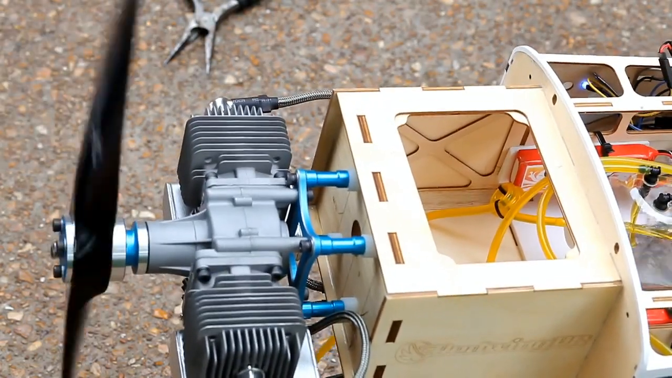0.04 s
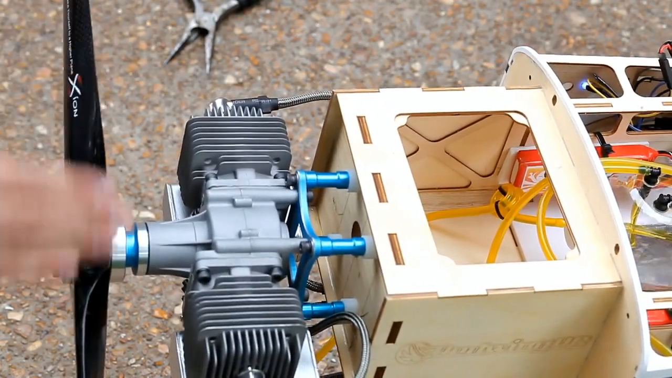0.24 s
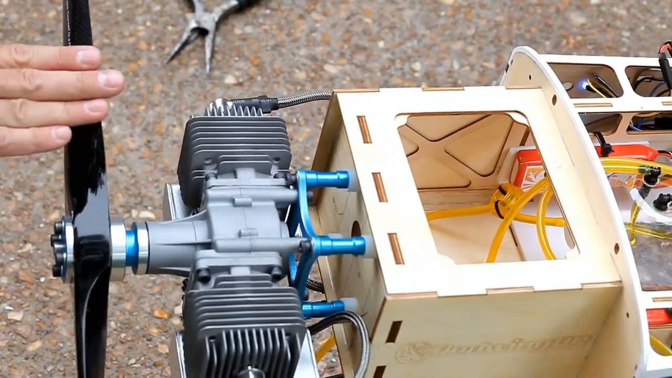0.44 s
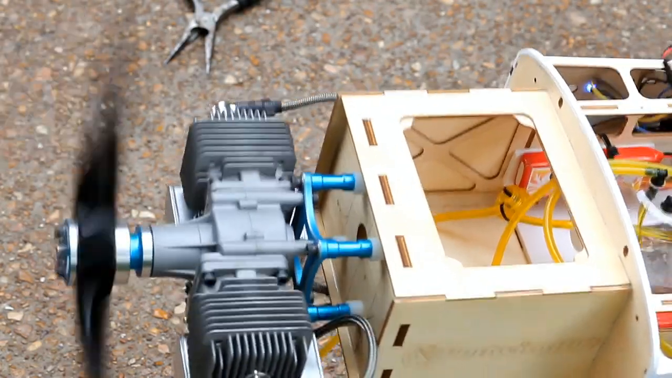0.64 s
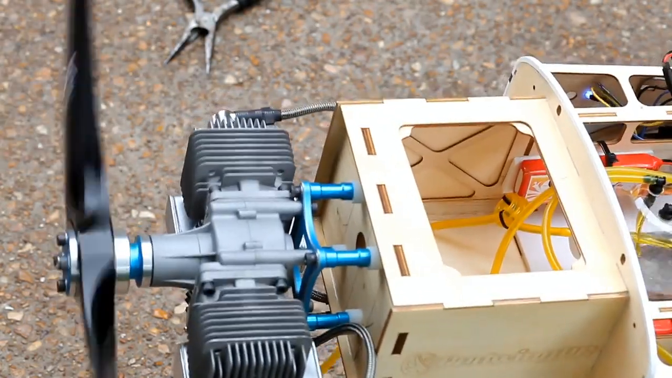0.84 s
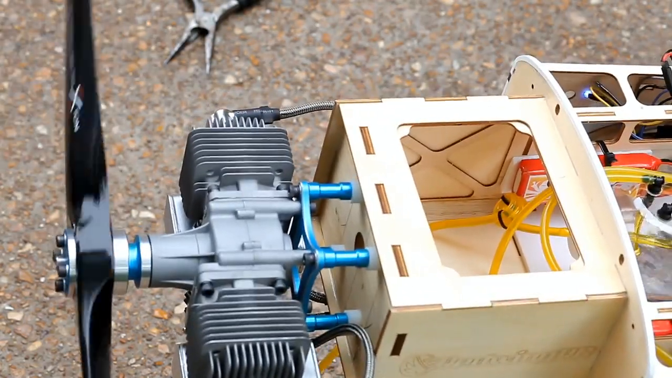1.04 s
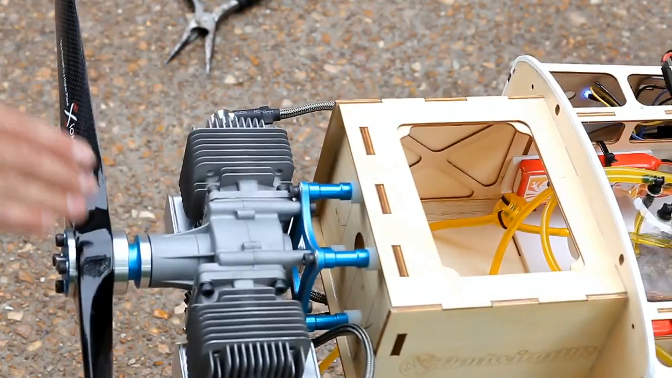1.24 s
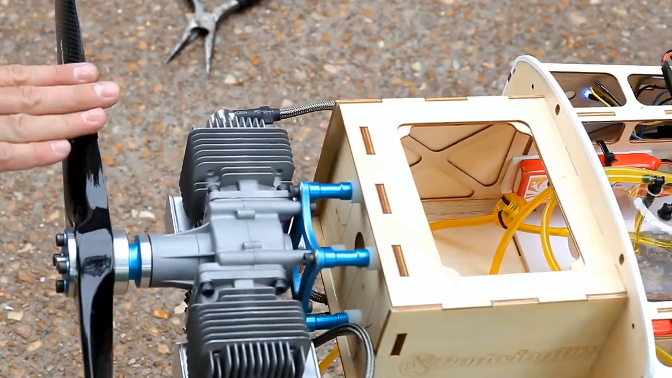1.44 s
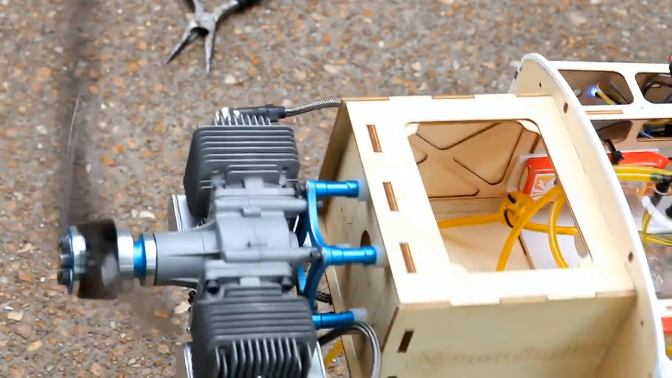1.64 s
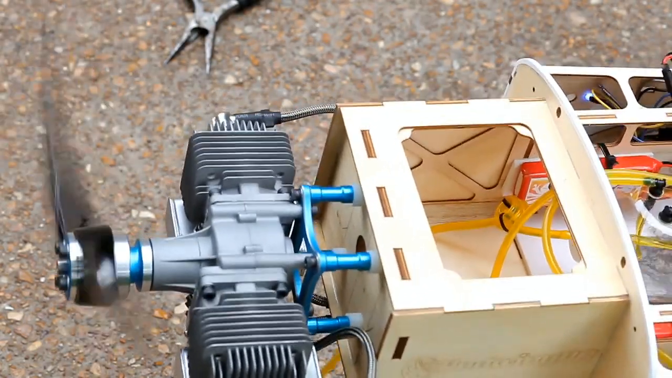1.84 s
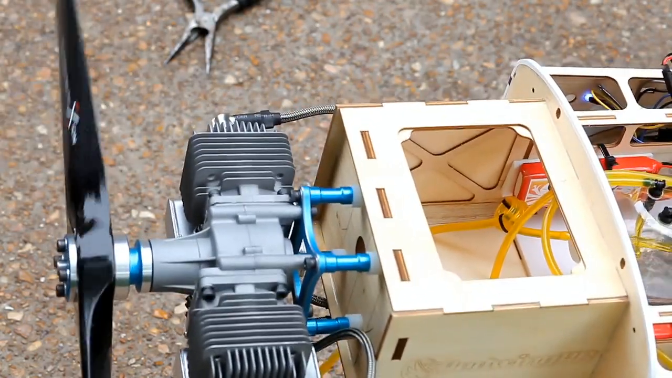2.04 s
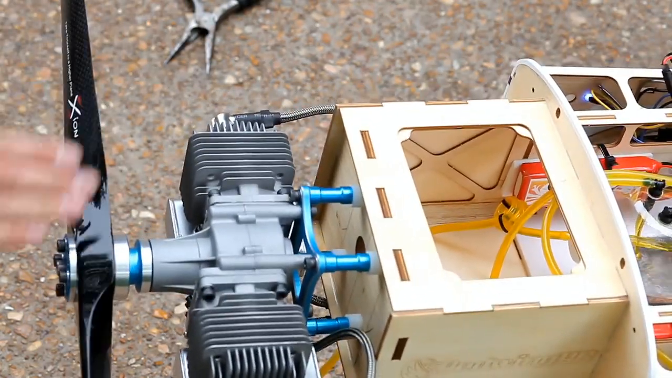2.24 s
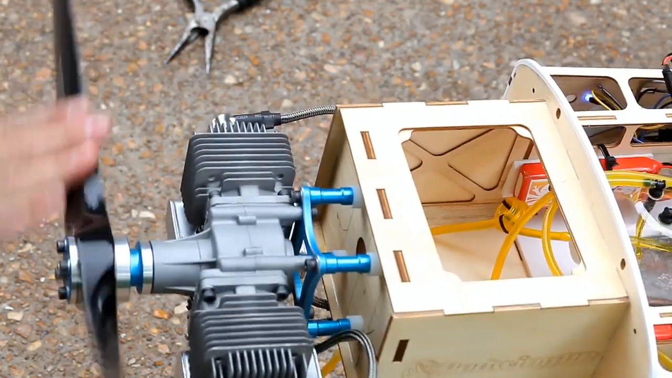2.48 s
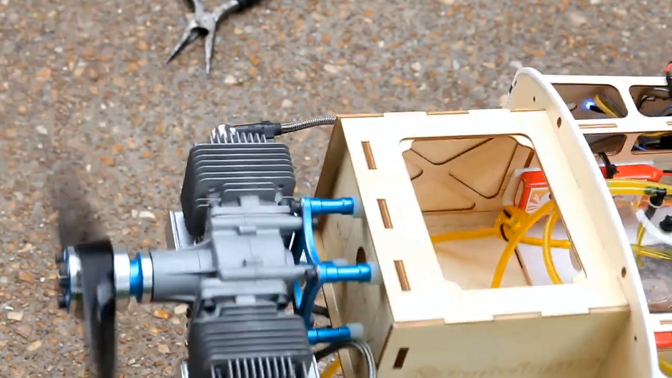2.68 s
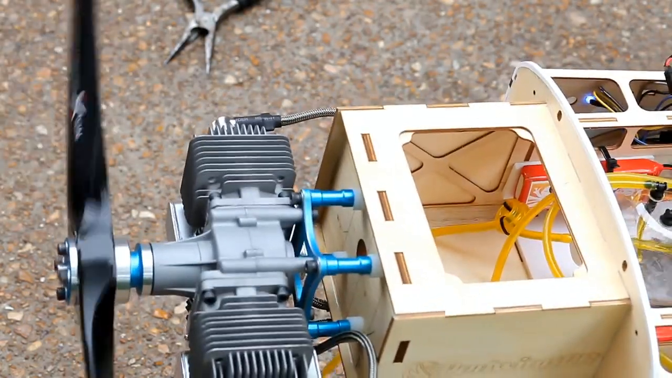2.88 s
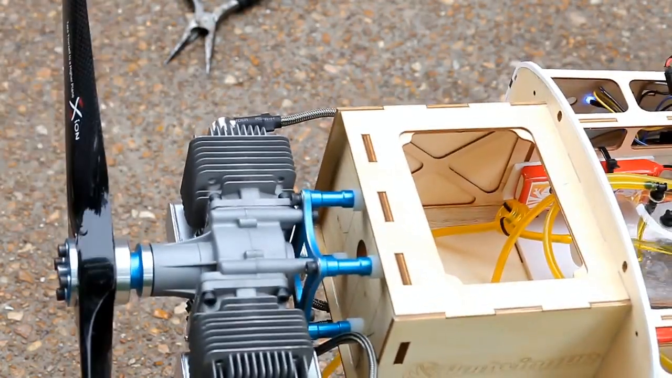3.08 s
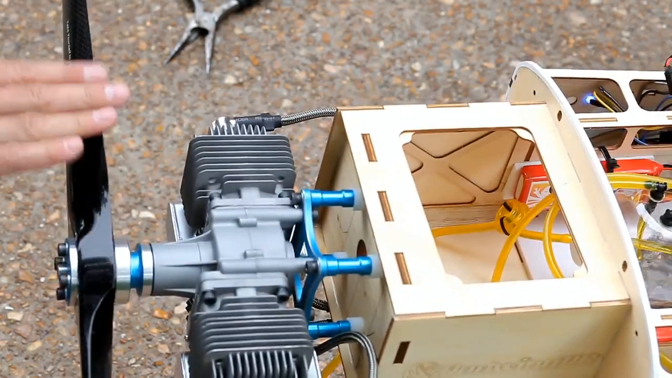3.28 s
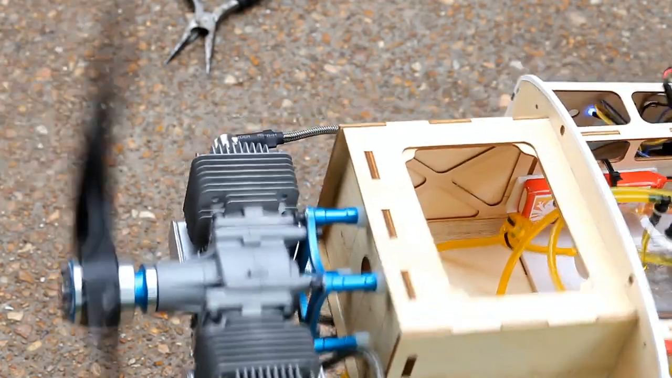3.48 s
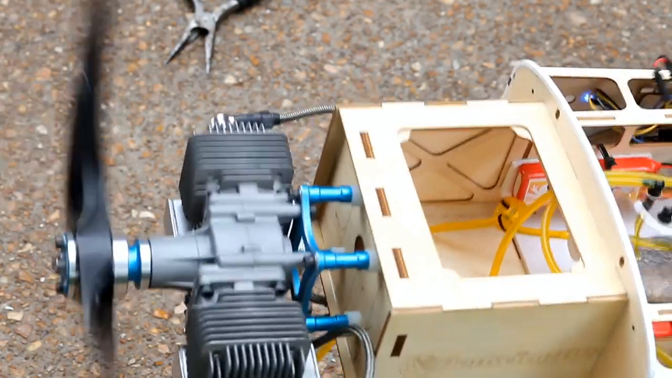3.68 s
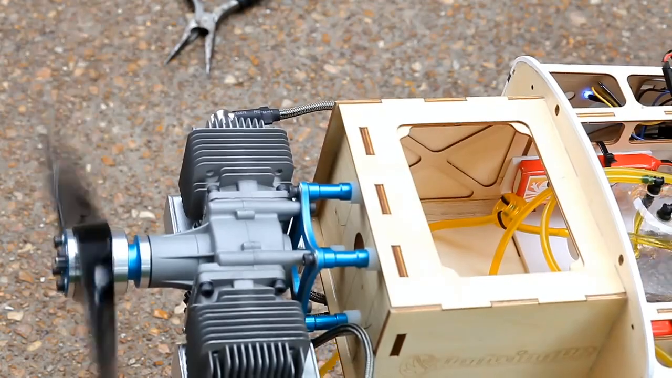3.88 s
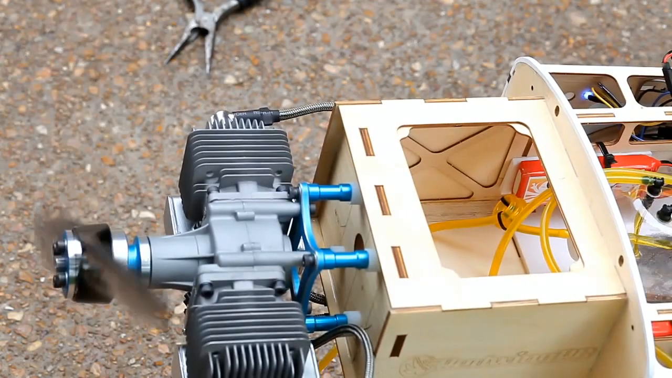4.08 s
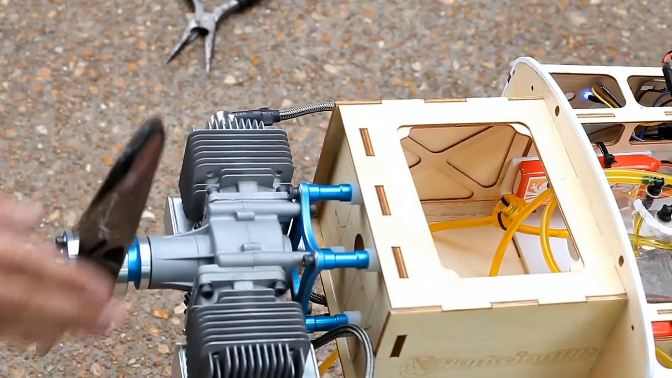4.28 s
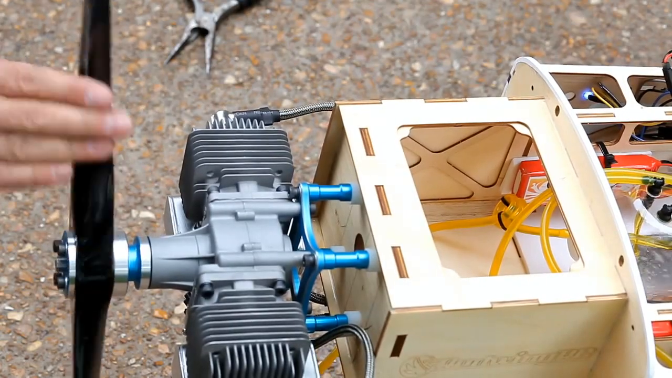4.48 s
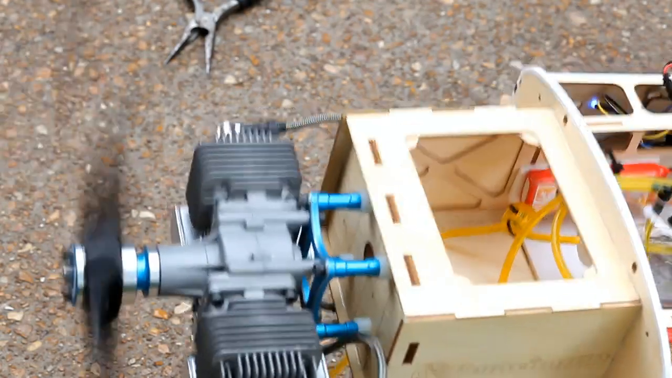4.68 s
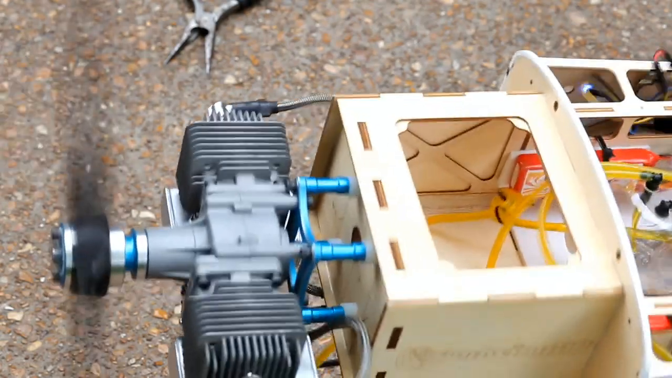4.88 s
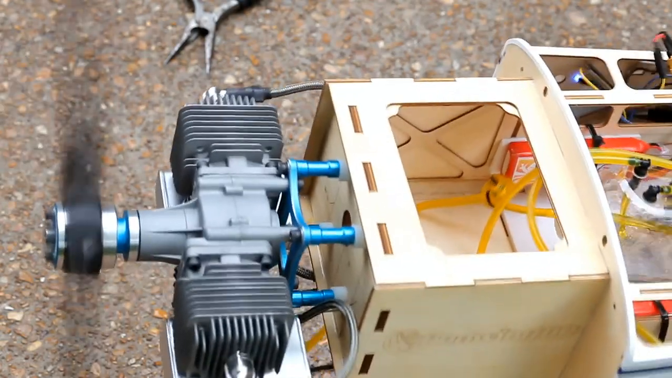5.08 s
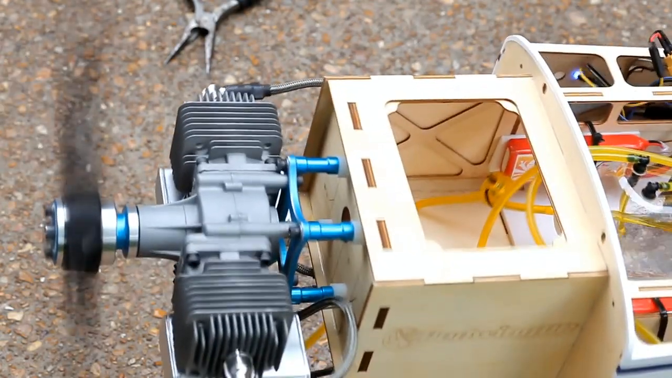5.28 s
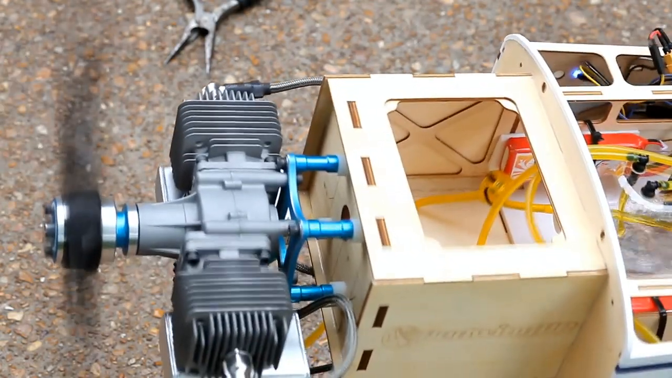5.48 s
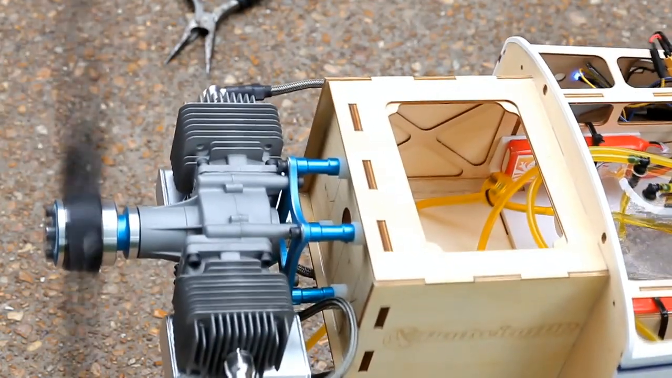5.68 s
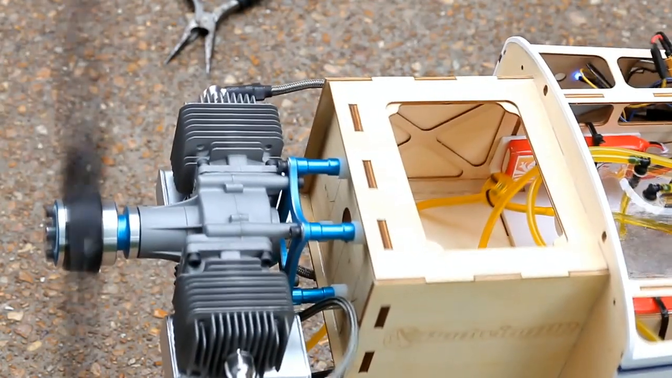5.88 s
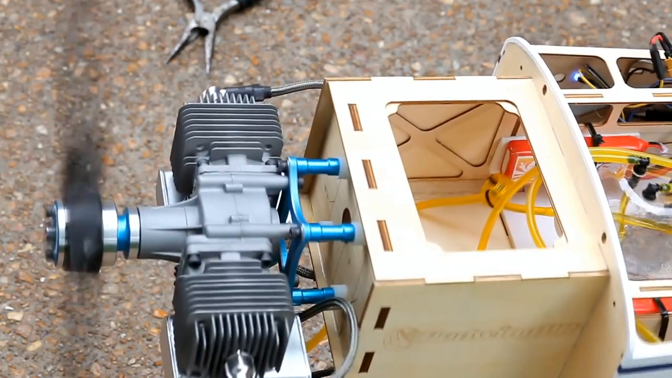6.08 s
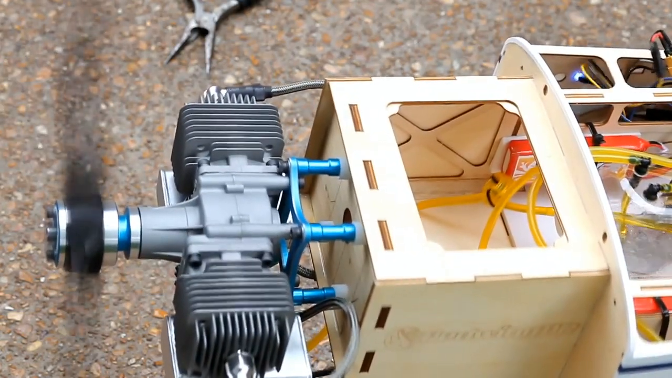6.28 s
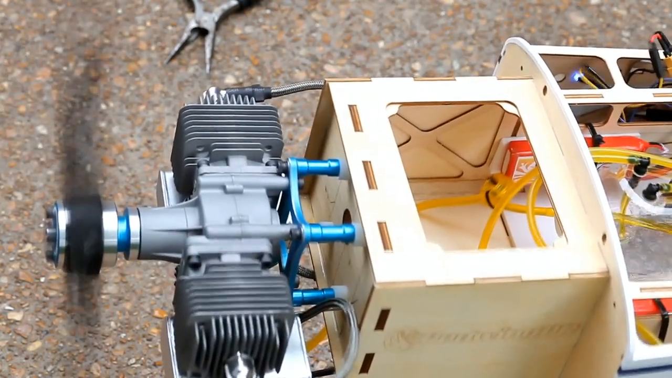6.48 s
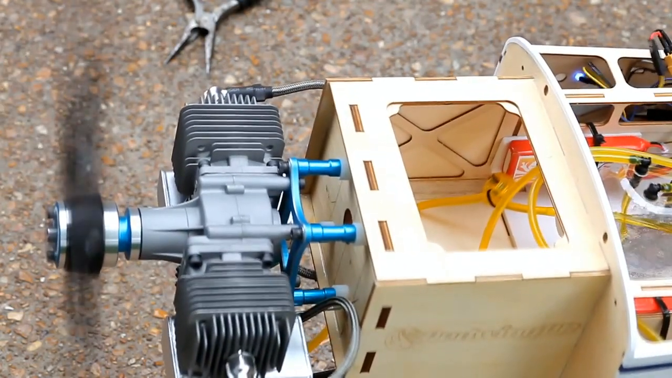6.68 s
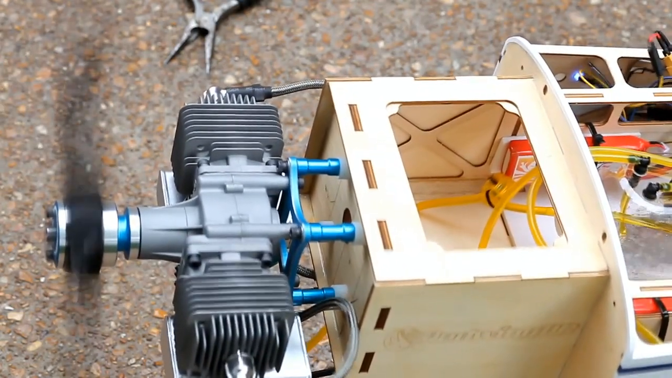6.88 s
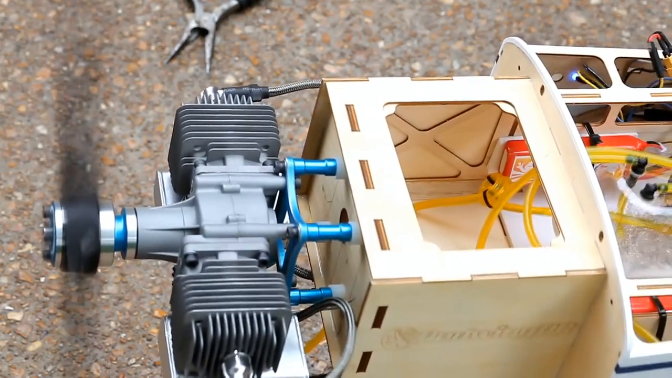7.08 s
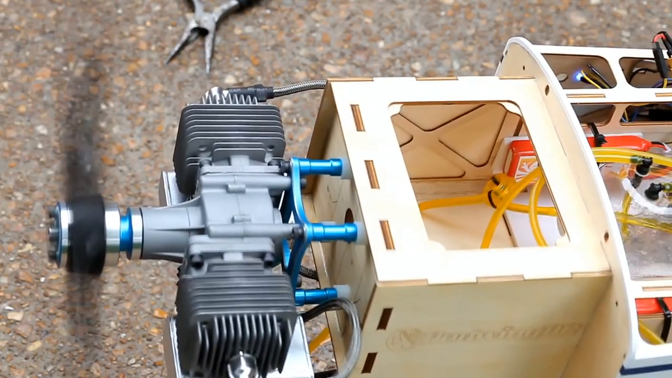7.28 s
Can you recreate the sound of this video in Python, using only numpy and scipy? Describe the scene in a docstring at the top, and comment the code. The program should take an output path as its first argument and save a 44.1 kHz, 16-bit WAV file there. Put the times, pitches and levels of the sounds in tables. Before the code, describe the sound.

A small two-cylinder petrol engine is hand-flipped, popping and rasping five times over quiet paving, then catches into a loud, uneven, barking idle.

```python
"""Starting a model aeroplane engine

A twin-cylinder two-stroke is flipped by hand over paving, heard from close by. Four flips rasp, pop and
rock to rest. On the fifth it catches, idles burning well on every other turn, revs briefly and sags.
Pressure pulses ring the muffler, shaped noise makes gas, air and scraping, and sine waves make the drone
and squeaks. The loudest peaks overload and are flattened."""
import sys
import numpy as np
from scipy import signal
from scipy.fft import rfft, irfft, next_fast_len
from scipy.io import wavfile
from scipy.ndimage import uniform_filter1d

SR = 44100
rng = np.random.default_rng(int(sys.argv[2]) if len(sys.argv) > 2 else 0)


def transcribe(u):
    """Save the signal u as a 16-bit wav file named by the first command-line argument.

    u: samples, shape (n,) or (channels, n), limited to [-1, 1]; the rate is SR.
    q: integer samples, one column per channel.
    """
    v = np.clip(np.atleast_2d(u).T, -1, 1)
    q = np.round(v * 32767).astype(np.int16)
    wavfile.write(sys.argv[1], SR, q)


N = 323253
T = np.arange(N) / SR
SHORT_T = T[:SR // 4]  # time within one short event, s
IDLE_HZ = 42  # turns per second at which the engine's levels are given
FULL_POP_DB = -5  # strength of a full pop
THROTTLE_S = (6.84, 7.085)  # the throttle opens and shuts, s


def undb(db):
    """Decibels to gain."""
    return np.exp(np.asarray(db) * np.log(10) / 20)


def add(track, s, sound):
    """Mix a sound into a track at a time in seconds."""
    start = int(s * SR)
    track[start:start + len(sound)] += sound[:max(N - start, 0)]


def through(x, response):
    """Pass a sound through an impulse response."""
    return signal.fftconvolve(x, response)[:N]


def noise(spectrum, size=N):
    """Noise of rms 1 coloured by a table of (frequency [Hz], relative level [dB])."""
    hz, db = np.transpose(spectrum)
    n = next_fast_len(size, True)
    f = np.maximum(np.fft.rfftfreq(n, 1 / SR), 1)
    bass_cut = np.minimum(f / hz[0], 1) ** 2
    gain = undb(np.interp(np.log(f), np.log(hz), db)) * bass_cut
    x = irfft(gain * rfft(rng.standard_normal(n)), n)[:size]
    return x / x.std()


def body(modes):
    """Impulse response of a set of resonances, peak 1: the wider a resonance, the faster it dies away."""
    response = np.zeros(len(SHORT_T))
    for hz, width, db in modes:
        decay = np.exp(-np.pi * width * SHORT_T)
        response += undb(db) * width * decay * np.cos(2 * np.pi * hz * SHORT_T)
    return response / np.abs(response).max()


def swell(seconds):
    """A push that peaks at 1 after the given time and dies away."""
    return SHORT_T / seconds * np.exp(1 - SHORT_T / seconds)


def push(seconds):
    """A pressure pulse of unit area: the longer, the duller."""
    return swell(seconds) / swell(seconds).sum()


def tent(s, rise_db_per_s, fall_db_per_s):
    """A gain that grows to 1 at the given time and dies away."""
    drop_db = np.maximum((s - T) * rise_db_per_s, (T - s) * fall_db_per_s)
    return undb(-drop_db.clip(0, 200))


def rattle(per_s=220, spread_db=4.0, decay_s=0.0022):
    """Envelope of dense small clacks of very unequal size; rms 1."""
    sizes = undb(spread_db * np.minimum(rng.exponential(size=N), 3))
    clacks = (rng.random(N) < per_s / SR) * sizes
    envelope = through(clacks, np.exp(-SHORT_T / decay_s))
    return envelope / np.sqrt(np.mean(envelope ** 2))


def waver(per_s):
    """Straight lines between random values, so many a second; spread near 1."""
    values = rng.standard_normal(len(SHORT_T))
    return np.interp(T * per_s, np.arange(len(values)), values) * np.sqrt(3 / 2)


# How fully the charge burns (0-1): good and poor turns of the idle, open throttle, after it shuts
GOOD_BURN, POOR_BURN, OPEN_BURN, SHUT_BURN = .94, .2, .98, .15
# Single turns with a burn of their own: (time [s], burn before random scatter [0-1])
STRAY_FIRINGS = [(4.826, .55), (4.886, .75), (4.94, .55), (5.043, .85), (5.198, .85), (5.351, .75),
                 (5.549, .8), (5.742, .6), (5.789, .6), (6.024, .82), (6.166, .75), (6.31, .5),
                 (6.549, .68), (6.69, .8), (6.783, .8), (7.09, .8), (7.127, .85), (7.186, .55),
                 (7.278, .78)]


def firings(turns, scatter=.07, late_s=0.0011, jitter_s=.00015):
    """Time and burn of each turn's firing: strong on every other turn at idle; a poor charge burns late."""
    count = np.arange(int(turns[-1] + .5))
    s = np.interp(count + .5, turns, T)
    opens, shuts = THROTTLE_S
    cases = [s > shuts, s > opens, count % 2 == 0]
    burn = np.select(cases, [SHUT_BURN, OPEN_BURN, GOOD_BURN], POOR_BURN)
    for at, stray in STRAY_FIRINGS:
        burn[np.argmin(np.abs(s - at))] = stray
    chance = rng.standard_normal((len(s), 2))
    burn = np.clip(burn + scatter * chance[:, 0], 0, 1.1)
    return s + late_s * (1 - burn) + jitter_s * chance[:, 1], burn


# Pops as the exhaust port opens, on the flips and as the engine catches:
# (time [s], strength [dB], pitch it sinks to [Hz])
POPS = [(.607, -10.5, 151), (.704, -17, 176), (.845, -28, 172), (1.587, -7, 163), (1.677, -15, 180),
        (1.807, -27, 175), (2.539, -5, 180), (2.624, -16, 191), (2.749, -23, 159), (3.478, -5, 215),
        (3.545, -6, 218), (3.595, -6.5, 179), (3.678, -12.5, 163), (3.792, -20.5, 165), (3.964, -35.5, 177),
        (4.659, -5, 238), (4.716, -5, 272), (4.755, -4, 247), (4.761, -3, 209)]
# Resonances of the muffler and of the cooling fins: (frequency [Hz], width [Hz], relative level [dB])
MUFFLER = [(150, 48, -13.5), (205, 74, -5.8), (268, 93, -8.3), (350, 69, -9.3), (546, 61, 0.3),
           (613, 76, 3.5), (708, 98, -1.5), (790, 60, -12), (905, 120, -7.5), (1550, 430, -11),
           (2320, 140, -22)]
FINS = [(1563, 280, 2), (2270, 180, -3.5), (3465, 100, 2.5), (4180, 1370, -5.5), (7326, 90, -3),
        (8030, 110, -2.5), (9780, 420, -7)]
# Colours of the gas jet and of unburnt fuel: (frequency [Hz], relative level [dB])
GAS = [(600, 21), (1000, 9), (2200, -30), (2900, -5.5), (4200, -4.5), (5300, -7.5), (6400, -12),
       (8000, 3.5), (10500, -5)]
SPRAY = [(3200, -14), (5100, -7), (6500, -14), (8500, -7), (9700, 0), (11000, -1)]


def exhaust(speed, turns, bark_db=17.3, poor_db=-6, sharp_s=0.00017, soft_s=0.0004,
            gas_db=-15.2, poor_gas_db=-16, fins_db=-1.2, uneven_db=1.9, uneven_gas_db=3.2,
            spray_db=-10.7, cold_db=16.5, warm_s=0.45, splutter_db=4, pop_bark_per_db=3.0):
    """Pressure pulses ring the muffler; the jet of gas after each hisses and rings the fins, never twice alike."""
    pressure, jet, shake, spray = np.zeros((4, N))
    times, burns = firings(turns)
    chances = rng.standard_normal((len(times), 5))
    for s, burn, (force, hiss, ring, wet, length) in zip(times, burns, chances):
        pace = np.interp(s, T, speed) / IDLE_HZ
        pulse_s = soft_s * (sharp_s / soft_s) ** burn  # a full burn is sharper
        pulse_db = bark_db + poor_db * (0.5 - burn) + uneven_db * force
        add(pressure, s, np.sqrt(max(pace, 1)) * undb(pulse_db) * push(pulse_s))
        puff = undb(gas_db + poor_gas_db * (1 - burn)) * pace * swell(0.0029 * np.exp(.15 * length))
        add(shake, s, undb(uneven_gas_db * ring) * puff)
        # the first firings spit out unburnt fuel with a bright hiss
        cold = np.exp((times[0] - s) / warm_s)
        add(jet, s, undb(splutter_db * cold + uneven_gas_db * hiss) * puff)
        add(spray, s, undb(spray_db + cold_db * cold + uneven_gas_db * wet) * puff)
    for s, strength_db, _ in POPS:
        db = pop_bark_per_db * (strength_db - FULL_POP_DB)  # a weaker pop loses its bark fast
        add(pressure, s, undb(db + 7.5) * push(0.00026))
        add(jet, s, undb(db - 20) * swell(0.0035))
    bark = -through(pressure, body(MUFFLER))
    gas = jet * noise(GAS)
    fins = through(shake * rng.standard_normal(N), body(FINS))
    fins *= undb(fins_db) * gas.std() / fins.std()  # level relative to the gas
    return bark + gas + spray * noise(SPRAY) + fins


# Colour of the loose fittings: (frequency [Hz], relative level [dB])
FITTINGS = [(400, -8), (700, 2), (1200, 0), (1600, 0), (2300, -5), (2900, -13), (3600, -5), (5000, -7),
            (7000, -22)]


def fittings(turns, db=-25, decay_s=.006, uneven_db=3.8, lag_s=.001):
    """Each firing shakes the muffler and the mounts, which rattle on raggedly as the shaking fades."""
    shake = np.zeros(N)
    times, burns = firings(turns)
    for s, burn, (size, length) in zip(times, burns, rng.standard_normal((len(times), 2))):
        fade = np.exp(-SHORT_T / (decay_s * np.exp(.35 * length)))
        add(shake, s + lag_s, burn ** 2 * undb(db + uneven_db * size) * fade)
    return shake * rattle(per_s=500, spread_db=4.5, decay_s=.0009) * noise(FITTINGS)


# Colour of the air wash: (frequency [Hz], relative level [dB])
WASH = [(30, -1), (80, -9), (200, -4), (440, -13), (560, -1), (700, 0), (1100, -3), (1700, -6.5),
        (2800, -15), (4200, -12.5), (6400, -23), (10500, -22.5)]
# What the turning crank and blades radiate: (multiple of the speed, level before speed and load [dB])
ORDERS_DB = [(1, -32), (2, -40), (3, -27), (4, -42), (5, -29.3)]


def propeller(speed, turns, wash_db=-23.6, wash_power=1.5, drone_power=1.6, throb=0.3,
              lag_turns=0.621, clatter=0.33, drone_top_hz=235, load_db=4.5):
    """Crank and blades drone unevenly in a clattering wash; both grow with speed, the drone with load too."""
    pace = uniform_filter1d(speed / IDLE_HZ, SR // 50).clip(0)
    opens, shuts = THROTTLE_S
    load = uniform_filter1d(1. * ((T > opens) & (T < shuts)), SR // 10)
    angle = 2 * np.pi * turns
    wash = undb(wash_db) * noise(WASH) * (1 - throb * np.cos(angle))
    wash *= 1 - clatter + clatter * rattle()
    # the drone's phase and loudness wander at random while the throttle is not open
    phase_wander, level_wander = .08 * waver(35), .22 * waver(42)
    swing = angle - 2 * np.pi * lag_turns + (1 - load) * phase_wander
    drone = np.zeros(N)
    for k, db in ORDERS_DB:
        treble_cut = np.hypot(1, (k * speed / drone_top_hz) ** 4)
        drone += undb(db) / treble_cut * np.cos(round(k) * swing)
    drone *= undb(load_db * load) * (1 + (1 - load) * level_wander)
    return pace ** wash_power * wash + pace ** drone_power * drone


def thumps(most_db=-6, full_swell_s=.0027, swell_s_per_db=.00034):
    """Compressed gas drops into the muffler, whose air bounces a few times, sinking in pitch."""
    out = np.zeros(N)
    for s, db, hz in POPS:
        pitch = hz * (1 + 0.4 * np.exp(-SHORT_T / 0.003))
        # weak pops swell slowly
        swell_s = full_swell_s + swell_s_per_db * max(FULL_POP_DB - db, 0)
        bounce = np.sin(2 * np.pi * np.cumsum(pitch) / SR)
        add(out, s, -undb(min(db, most_db)) * swell(swell_s) ** 2 * bounce)
    return out


# Two gulps of air a flip: (first gulp [s], its level [dB], second gulp [s], its level [dB],
# hiss level before its trim [dB])
FLIPS = [(.598, -29, .685, -27, -15), (1.582, -27, 1.668, -24, -13), (2.535, -28, 2.614, -22, -13.5),
         (3.474, -27, 3.598, -16.5, -15), (4.655, -23, 4.765, -15, -12)]
# Gas spits back through the carburettor: (time [s], level of its hiss [dB])
SPITS = [(2.632, -34), (3.53, -21.5), (4.714, -26)]
# The intake reeds flutter: (time [s], level [dB])
FLUTTERS = [(.591, -26), (.677, -27), (.735, -29), (1.576, -30), (1.668, -25), (1.734, -27), (2.529, -30),
            (2.610, -21), (2.645, -17), (3.466, -23), (3.6, -9.5), (4.649, -24.5)]
# Colours of the intake's rasp and hiss: (frequency [Hz], relative level [dB])
RASP = [(100, -10), (320, -4), (500, -5), (760, 0.5), (1100, -9), (1700, -8.5), (2700, -24.5), (5000, -38),
        (11000, -56)]
HISS = [(1500, -2), (3500, -6.5), (5500, 0.5), (7500, -7), (10500, -5)]
# Rise and fall of the first and second gulp, dB per s
FIRST_GULP, SECOND_GULP = (1100, 115), (380, 175)
# Slow draught as the blade is pushed round and rocks to rest: peak dB; rise and fall, dB per s
DRAUGHT_DB, DRAUGHT = -36, (235, 50)


def intake(reed_hz=770, rasp_db=-3, hiss_db=-2, steady=0.5, coarse=0.75, spit_s=.025):
    """Air rasps coarsely through the carburettor, two gulps a flip, and sets the reeds fluttering."""
    rasp, hiss, reeds = np.zeros((3, N))
    for first_s, first_db, second_s, second_db, flip_hiss_db in FLIPS:
        draught = undb(DRAUGHT_DB) * tent(first_s, *DRAUGHT)
        first = np.maximum(undb(first_db) * tent(first_s, *FIRST_GULP), draught)
        second = undb(second_db) * tent(second_s, *SECOND_GULP)
        air = np.hypot(first, second)
        rasp += undb(rasp_db) * air
        hiss += undb(flip_hiss_db + hiss_db) * air
    for s, db in SPITS:
        add(hiss, s, undb(db) * np.exp(-SHORT_T / spit_s))
    for (s, db), detune in zip(FLUTTERS, rng.standard_normal(len(FLUTTERS))):
        hz = reed_hz * (1 + 0.037 * detune)
        add(reeds, s, undb(db) * swell(0.0022) * np.sin(2 * np.pi * hz * SHORT_T))
    grain = steady + coarse * rattle(per_s=200, spread_db=4.1)
    return grain * (rasp * noise(RASP) + hiss * noise(HISS)) + reeds


# The piston scrapes along its bore while the crank swings: (start [s], length [s], level [dB])
SCRAPES = [(.595, .1, -32), (1.6, .125, -37.5), (2.55, .115, -37), (2.865, .19, -52), (3.415, .065, -43),
           (3.532, .062, -21.5), (3.64, .05, -33)]
# Colour of the scrape: (frequency [Hz], relative level [dB])
SCRAPE = [(250, -3), (480, 1), (780, 3), (1150, -5), (1700, -4), (2800, -21), (5000, -20), (10500, -26)]


def scrapes(steady=.3, grainy=.75):
    """Piston rings drag through the bore in a fine, crackling grain."""
    drag = np.zeros(N)
    for s, length, db in SCRAPES:
        arch = np.sin(np.pi * np.minimum(SHORT_T / length, 1)).clip(0)
        add(drag, s, undb(db) * np.sqrt(arch))
    grain = steady + grainy * rattle(per_s=300, spread_db=4, decay_s=.0013)
    return drag * grain * noise(SCRAPE)


# Crank and piston knock in their play:
# (time [s], tick level [dB], strength of the airframe blow [dB], softness of the contact [0-1])
KNOCKS = [(.626, -28, -46, .2), (.652, -25, -39, .2), (.680, -34, -36, .5), (.691, -28, -42, .2),
          (.830, -36, -44, .9), (1.101, -49, -29, .9), (1.1077, -60, -25, .9), (1.667, -27, -35, .3),
          (1.680, -22, -39, .2), (1.798, -33, -46, .4), (2.023, -50, -47, .8), (2.456, -40, -56, .4),
          (2.633, -27, -42, .2), (3.529, -16, -18, .45), (3.57, -26, -19, .8), (3.6, -17, -23, .3),
          (3.668, -32, -40, .2), (3.706, -37, -36, .3), (3.764, -44, -36, .8), (3.783, -41, -44, .9),
          (3.802, -41, -44, .9), (3.952, -39, -36, .7), (4.713, -17, -30, .2), (4.736, -22, -28, .2)]
# Colours of hard and soft ticks: (frequency [Hz], relative level [dB])
HARD_TICK = [(600, 9), (1800, 6), (3000, -8), (5000, -3), (7500, -9), (10500, -13)]
SOFT_TICK = [(600, 3), (1700, 5), (2800, -6), (4300, -6), (6500, -16), (10500, -28)]
# Resonances of the airframe: (frequency [Hz], width [Hz], relative level [dB])
AIRFRAME = [(468, 14, 4), (585, 70, 7), (598, 12, 11), (813, 15, 1), (1700, 150, -14)]


def knocks(tick_s=0.0055, rise_s=.004, contact_s=.00025):
    """Metal ticks as the crank takes up its play, a soft contact slower and duller; the plywood airframe rings."""
    hard, soft, blows = np.zeros((3, N))
    for s, tick_db, ring_db, softness in KNOCKS:
        softness = np.clip(softness, .05, 1)
        shape = -np.expm1(-SHORT_T / (rise_s * softness)) * np.exp(-SHORT_T / tick_s)
        tick = undb(tick_db) * shape / shape.max()
        add(hard, s, (1 - softness) * tick)
        add(soft, s, softness * tick)
        add(blows, s, undb(ring_db) * push(contact_s * softness))
    ticks = hard * noise(HARD_TICK) + soft * noise(SOFT_TICK)
    return ticks + through(blows, body(AIRFRAME))


# Dull bumps of the hand on the blade and of the rocking model: (time [s], level [dB])
BUMPS = [(1.487, -41), (2.023, -45), (2.16, -49), (2.2, -49), (2.563, -23.5), (3.503, -28), (4.682, -22)]


def bumps(swell_s=.005):
    """Soft, broad clunks with no clear pitch."""
    force = np.zeros(N)
    for s, db in BUMPS:
        add(force, s, undb(db) * swell(swell_s))
    return force * noise([(130, -4), (230, 0), (340, -1), (470, -9), (800, -18), (2000, -35), (8000, -60)])


# Dry metal chirps as the crank turns slowly: (time [s], mean pitch [Hz], level [dB])
CHIRPS = [(.78, 1640, -43), (1.765, 1500, -48), (2.697, 1630, -35), (2.742, 1450, -40), (3.53, 2390, -19),
          (3.579, 1780, -22), (3.651, 1790, -28), (3.836, 1650, -41), (3.861, 1700, -46), (3.9, 1520, -47)]


def chirps(rise_s=0.0036, wobble=0.083):
    """Short squeaks of unsteady pitch."""
    out = np.zeros(N)
    for s, hz, db in CHIRPS:
        pitch = hz * (1 + wobble * noise([(50, 3), (400, -3), (2000, -40)], size=len(SHORT_T)))
        add(out, s, undb(db) * swell(rise_s) * np.sin(2 * np.pi * np.cumsum(pitch) / SR))
    return out


def burble(start=2.872, end=3.0, from_hz=160, to_hz=125, db=-12.5):
    """Trapped gas burbles out of the muffler after the third flip, in pulses that slow down."""
    pressure, s = np.zeros(N), start
    while s < end:
        arch = np.sin(np.pi * (s - start) / (end - start))
        add(pressure, s, undb(db) * arch * push(.0008))
        s += 1 / np.interp(s, [start, end], [from_hz, to_hz])
    return through(pressure, body(MUFFLER))


def yard_echo(x, db=-24.742, low_t60=0.5, high_t60=0.19):
    """Nearby walls scatter a short, dull tail: noise that dies 60 dB in each t60, in seconds."""
    low = noise([(80, -2), (250, 3), (800, -2.5), (2000, -8), (10000, -59)], size=SR // 2)
    high = noise([(1500, -12), (3000, 19), (10000, -28)], size=SR // 2)
    t = T[:SR // 2]
    tail = low * undb(-60 * t / low_t60) + 0.43 * high * undb(-60 * t / high_t60)
    tail *= np.minimum(t / 0.004, 1)
    return through(x, undb(db) * tail / np.sqrt(np.sum(tail ** 2)))


# Colour of the quiet yard: (frequency [Hz], relative level [dB])
YARD = [(15, -51), (25, -7.5), (91, -15), (123, -7), (199, -17), (231, -5), (256, -19), (346, -13.5),
        (403, -22), (481, -17), (818, -13.5), (905, -17), (1700, -18.5), (4800, -27.5), (10500, -28),
        (13600, -88), (22000, -120)]


def yard(yard_db=-55.6, hum_db=-68.5, hum_hz=237):
    """Steady coloured noise and a faint pure hum."""
    return undb(yard_db) * noise(YARD) + undb(hum_db) * np.sin(2 * np.pi * hum_hz * T)


# Crankshaft speed, which picks up, idles, revs and sags: (time [s], turns per second [Hz])
SPEED = [(4.78, 31.74), (4.85, 33.08), (4.93, 38.45), (5.2, 38.83), (5.87, 42.87), (6.15, 41.93),
         (6.5, 41.79), (6.7, 42.92), (6.85, 42.69), (7.02, 62.7), (7.2, 46.2), (7.33, 35.3)]


def scene():
    """Engine and propeller over a quiet yard with a faint hum."""
    seconds, hz = np.transpose(SPEED)
    speed = np.interp(T, seconds, hz, left=0)
    turns = np.cumsum(speed) / SR
    running = exhaust(speed, turns) + fittings(turns) + propeller(speed, turns)
    starting = thumps() + intake() + scrapes() + knocks() + bumps() + chirps() + burble()
    engine = running + starting
    return (engine + yard_echo(engine) + yard())[None]


def record(dry, ceiling=0.98, bias=0.091, treble_cut_hz=10700, top_hz=16000):
    """Overload flattens loud peaks lopsidedly; treble is cut at treble_cut_hz, then loud peaks clip again."""
    x = ceiling * (np.tanh(dry / ceiling - bias) + np.tanh(bias))
    x = signal.sosfilt(signal.ellip(10, .2, 70, treble_cut_hz, fs=SR, output="sos"), x)
    x = np.clip(x, -.74, .84)
    x = signal.sosfilt(signal.butter(1, 25, "high", fs=SR, output="sos"), x)
    return signal.sosfilt(signal.ellip(8, .2, 70, top_hz, fs=SR, output="sos"), x)


dry = scene()
out = record(dry)
transcribe(out)
```